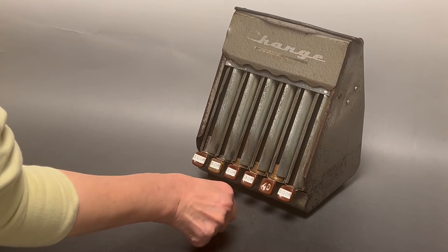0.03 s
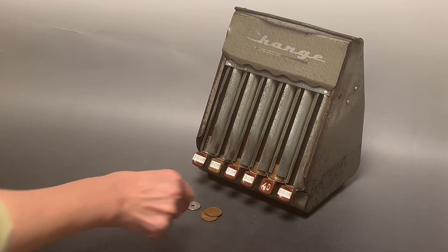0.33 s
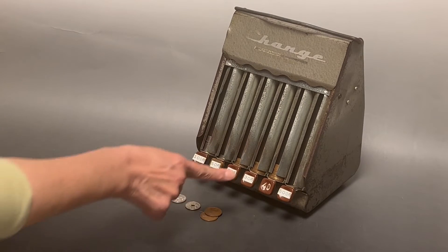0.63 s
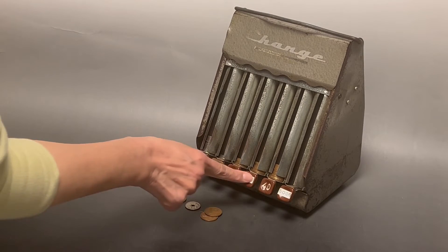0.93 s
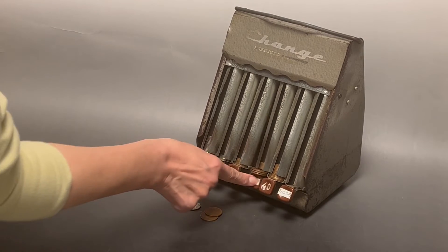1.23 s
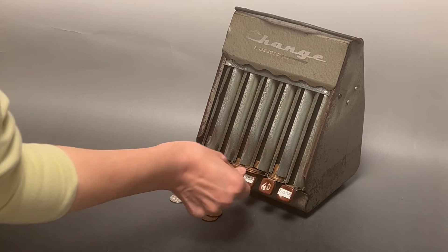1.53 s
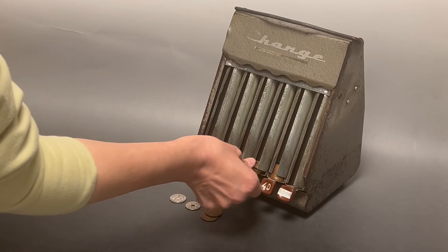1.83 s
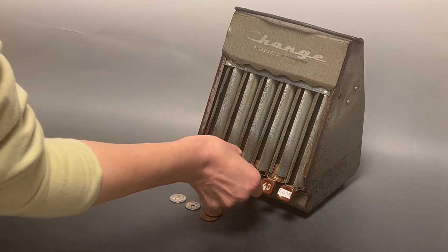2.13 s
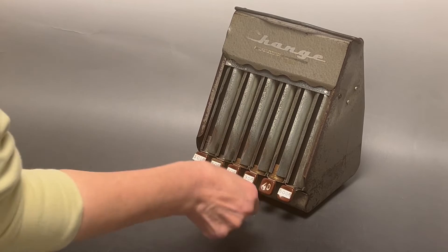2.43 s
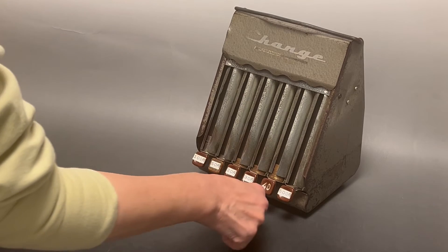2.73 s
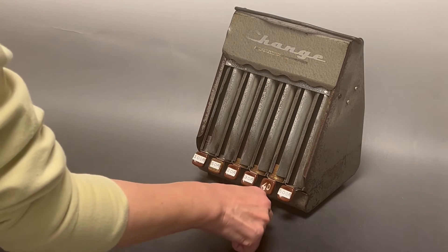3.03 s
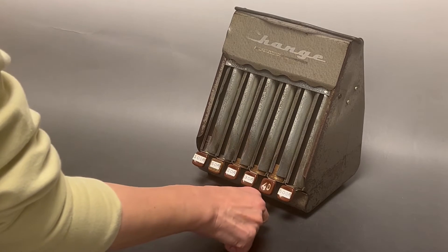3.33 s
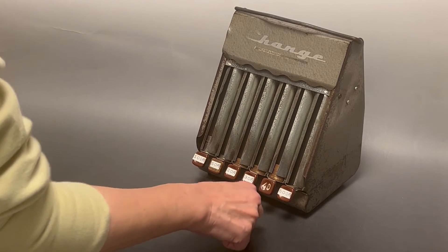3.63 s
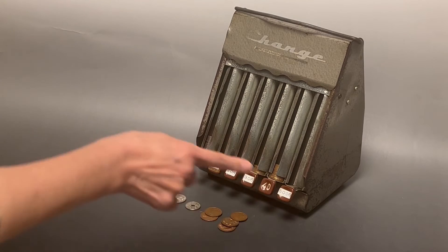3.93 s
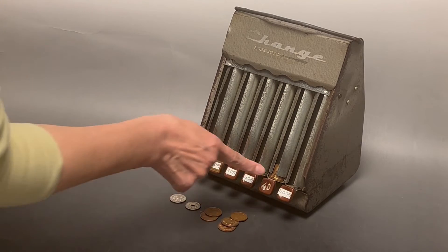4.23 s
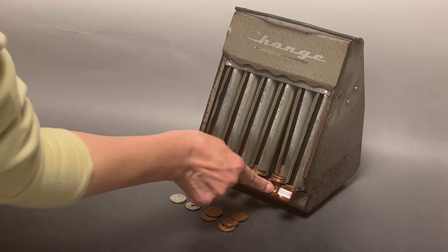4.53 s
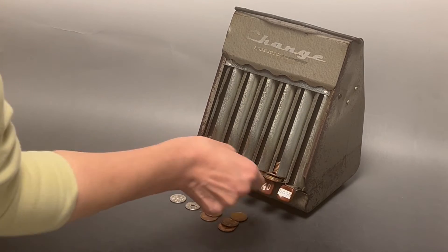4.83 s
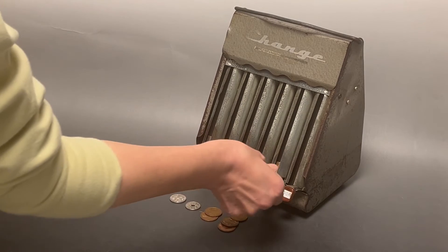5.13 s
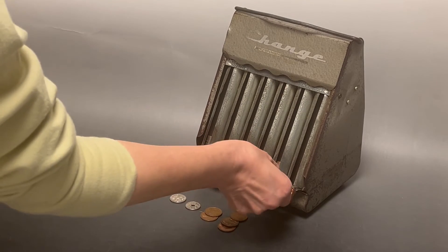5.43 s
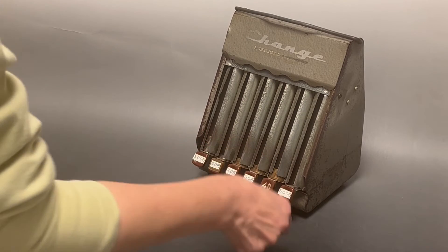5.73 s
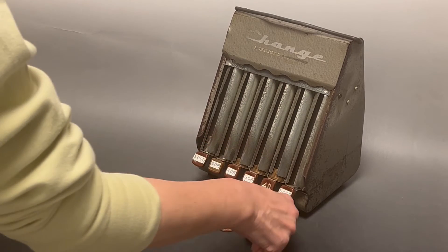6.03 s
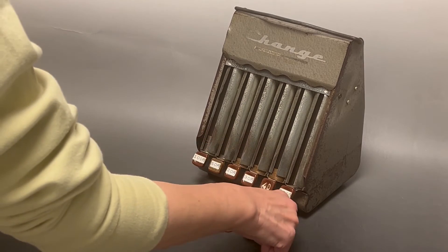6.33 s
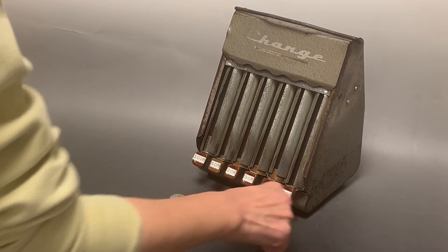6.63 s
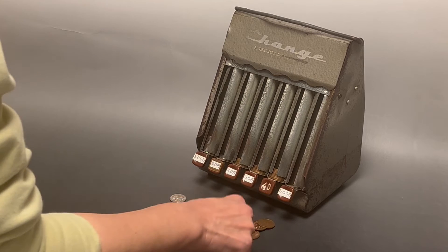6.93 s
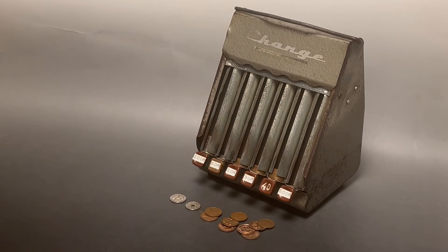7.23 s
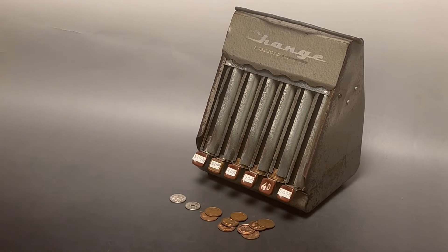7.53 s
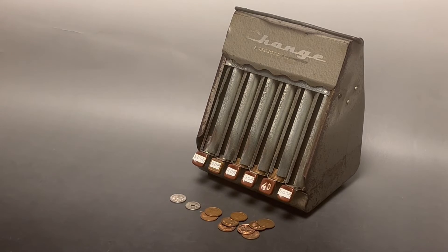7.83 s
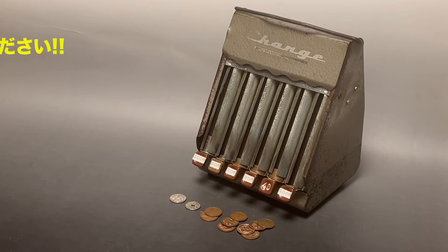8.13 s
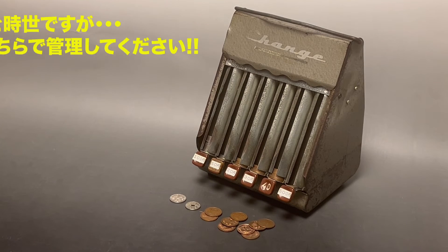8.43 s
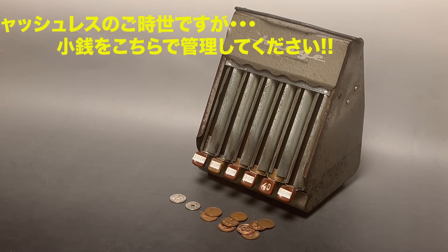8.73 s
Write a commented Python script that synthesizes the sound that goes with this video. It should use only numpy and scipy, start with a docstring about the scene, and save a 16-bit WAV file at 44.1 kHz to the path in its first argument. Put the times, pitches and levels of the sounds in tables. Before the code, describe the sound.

Two scraping, clacking lever strokes on a sheet-metal coin dispenser, with light clinks of coins laid on a table in between.

```python
"""In a quiet room, close to a two-port microphone, a coin is laid on a table, edge first, and rings.
A hand presses a lever of an old sheet-metal coin dispenser: it catches, scrapes, knocks and clacks
against its stop, each impact exciting the modes of the case; let go, it slides back and snaps home.
Coins tick in the hand, slide and are laid down; a second lever makes its stroke; more coins follow.
At the end the arm draws back, its sleeve brushing, and bumps the table softly."""
import sys
import numpy as np
from scipy import signal
from scipy.fft import rfft, irfft
from scipy.io import wavfile
from scipy.ndimage import uniform_filter1d

SR = 44100
rng = np.random.default_rng(int(sys.argv[2]) if len(sys.argv) > 2 else 0)


def transcribe(signal):
    """Save signal, clipped to [-1, 1], as a 16-bit WAV file at the path in sys.argv[1]."""
    frames = np.atleast_2d(signal).T
    limited = np.clip(frames, -1, 1)
    pcm = np.round(limited * 32767).astype(np.int16)
    wavfile.write(sys.argv[1], SR, pcm)


N = 392049


# lever pressed down: (finger lands [s], catches [s], knocks half way [s], is pushed on [s], hits stop [s],
# first-half force [dB], second-half force [dB], knock brightness [dB], rebound from the stop [dB])
PRESSES = [(.908, .941, 1.053, 1.214, 1.275, 1.5, 0, -10, -6),
           (4.333, 4.345, 4.464, 4.649, 4.678, -1.5, -.5, -3, 1.5)]
# lever let go: (comes free [s], slides [s], snaps home [s], freeing force [dB], swell [dB], force [dB])
RELEASES = [(2.051, 2.069, 2.158, -49, 13, -.5), (5.27, 5.375, 5.493, -41, 26, 0.5)]
# loose lever rattling in its guide: (time [s], level [dB], brightness [dB])
RATTLES = [(1.19, -55, -11), (1.238, -50, 6), (2.001, -63, -10), (2.069, -47, -2), (5.465, -35, 8)]
def dispenser():
    """Superposition: the case's responses to every rattle, press and release add up."""
    sounds = [blow(s, 0, db, bright_db, crack_db=-3) for s, db, bright_db in RATTLES]
    for down, up in zip(PRESSES, RELEASES):
        sounds += press(*down) + release(*up)
    out = np.zeros((2, N))
    for s, sound in sounds:
        add(out, s, sound)
    return out


# contacts going down: (level [dB], brightness [dB], crack [dB])
TOUCH, CATCH, PUSH, STOP = (-44, -9.5, -3), (-31, 1.7, -7), (-46, -6, -2), (-19.8, 1.5, 0)
# their bounces: (delay [s], level [dB], brightness [dB], crack [dB])
CATCH_BOUNCE, STOP_BOUNCE = (.0145, -34, 3, 8), (.0075, -23.5, -1.5, 3)
# scrapes: (final level [dB], brightness [dB], swell [dB])
SCRAPE_TO_KNOCK, SCRAPE_TO_STOP = (-49.5, -10, 3), (-46.5, -6, 2)
def press(touch, catch, knock, push, stop, first_db, second_db, knock_bright_db, rebound_db):
    """Impact and friction alternate: the lever catches, scrapes, knocks, rests and runs to its stop."""
    return [blow(touch, first_db, *TOUCH),
            *clack(catch, first_db, CATCH, CATCH_BOUNCE),
            scrape(catch, knock, 0, *SCRAPE_TO_KNOCK),
            blow(knock, 0, db=-36.5, bright_db=knock_bright_db, crack_db=5),
            blow(push, 0, *PUSH),
            scrape(push, stop, second_db, *SCRAPE_TO_STOP),
            *clack(stop, second_db, STOP, STOP_BOUNCE, rebound_db)]


# contacts coming back: (level [dB], brightness [dB], crack [dB])
FREE, SNAP = (-1, -2.5, -5), (-28, 9, 7)
SNAP_BOUNCE = (.035, -41.5, -5, 7)  # (delay [s], level [dB], brightness [dB], crack [dB])
def release(free, slide, home, free_db, swell_db, force_db):
    """Restoring force: the lever comes free and its spring drags it back until it snaps home."""
    return [blow(free, free_db, *FREE),
            scrape(slide, home, force_db, db=-37.5, bright_db=-2, swell_db=swell_db),
            *clack(home, force_db, SNAP, SNAP_BOUNCE)]


def clack(s, force_db, contact, bounce, rebound_db=0):
    """Elastic rebound: a firm contact strikes twice."""
    delay, *second_contact = bounce
    return [blow(s, force_db, *contact), blow(s + delay, force_db + rebound_db, *second_contact)]


def blow(s, force_db, db, bright_db, crack_db):
    """Impulsive excitation: a lever strikes the case once. Returns (time, sound)."""
    response = case_ring(bright_db, dense_db=-1.11, t60_scale=.96)
    return s, amp(force_db + db) * strike(response, crack_db, crack_s=.0031, rise_s=.0012)


def scrape(s, end, force_db, db, bright_db, swell_db):
    """Sliding friction: the lever grows louder as it gathers speed. Returns (time, sound)."""
    response = case_ring(bright_db, dense_db=-1.5, t60_scale=.9)
    return s, amp(force_db) * rub(response, end - s, db - swell_db, db, slips_per_s=600, spread_db=5)


# dense modes of the sheet-metal case: (frequency [Hz], level [dB])
CASE_SPECTRUM = [(100, -7.5), (180, -2.5), (270, -10), (400, -3.5), (560, -7.5), (900, -2.5), (1500, -1.5),
                 (2300, -2), (3100, -6), (5000, -6), (9000, -10.5), (13000, -7.5), (15000, -13),
                 (16200, -33)]
# its distinct modes: (frequency [Hz], level [dB], T60 [s])
CASE_MODES = [(177, -19, 0.23), (355, -21, .42), (411, -20.5, .38), (553, -23.5, 0.38), (696, -22, .42),
              (778, -23, 0.23), (861, -17, .32), (1035, -17.5, .26), (1102, -19, 0.29), (1231, -18.5, 0.27),
              (1470, -19, 0.19), (1657, -19, .26), (2066, -17.5, 0.16), (2300, -17, .19),
              (2655, -19.5, 0.21), (3924, -23, .18)]
# tilt with contact hardness: (frequency [Hz], gain per unit of brightness [dB/dB])
HARDNESS_TILT = [(300, -1), (950, -0.91), (2200, -0.51), (3800, 0), (8000, 0.19), (12000, 0.84)]
def case_ring(bright_db, dense_db, t60_scale):
    """Plate vibration: a harder, smaller contact excites less bass and more treble."""
    tint = [(hz, slope * bright_db) for hz, slope in HARDNESS_TILT]
    return ring(CASE_SPECTRUM, tint, CASE_MODES, dense_db, t60_scale)


# single parts left ringing, such as a spring, tube or coin: (time [s], frequency [Hz], level [dB], T60 [s])
PINGS = [(1.275, 6800, -60.5, 0.41), (1.275, 2767, -55, 0.43), (4.44, 1090, -43, .16),
         (4.68, 690, -37.5, 0.4), (4.68, 716, -37, .55), (5.49, 355.3, -52.5, .8), (6.421, 3230, -42, .16),
         (5.638, 5440, -50.5, 0.087)]
def pings():
    """Free vibration: after a blow or slip, a part rings on at its natural frequency."""
    out = np.zeros((2, N))
    for s, hz, db, t60 in PINGS:
        add(out, s, amp(db) * mode(hz, t60, SR))
    return out


# coins laid down: (landing time [s], level [dB], body [dB], table knock [dB], edge lead [s],
# edge level [dB], bounce interval [s], first bounce level [dB])
LANDINGS = [(.058, -38, -12, -52, .011, -42, .0105, -38.5),
            (2.799, -43.5, -10.5, -48.5, .021, -59, .02, -63), (3.526, -46, 7, -45, .008, -42, .014, -54),
            (6.421, -35.5, 5, -50, .031, -50, 0.026, -42)]
def laid_coins(bounces=3, loss_db=7):
    """Inelastic collision: a coin touches edge first, lands flat and loses energy at each bounce."""
    out = np.zeros((2, N))
    for s, db, body_db, knock_db, lead, edge_db, gap, bounce_db in LANDINGS:
        add(out, s - lead, clink(edge_db, body_db=-22, treble_db=4, crack_db=-12))
        add(out, s, clink(db, body_db, treble_db=-6, crack_db=9.5))
        add(out, s, table_knock(knock_db, bright_db=-2.5))
        for k in range(bounces):
            bounce = clink(bounce_db - k * loss_db, body_db - 9, treble_db=7, crack_db=7.5)
            add(out, s + (k + 1) * gap, bounce)
    return out


# dense modes of a struck coin: (frequency [Hz], level [dB])
COIN_SPECTRUM = [(150, -9), (400, -12.5), (1000, -14), (1600, -6.5), (2500, -9.5), (3400, -5.5),
                 (5000, -14), (6500, -15), (7700, -5.5), (9300, -18), (11500, -15), (12900, 0.5),
                 (14200, -14), (16200, -46.5)]
# its distinct modes: (frequency [Hz], level [dB], T60 [s])
COIN_MODES = [(3250, -17.5, .12), (7730, -20.5, 0.26), (7630, -18.5, 0.21), (7865, -23, 0.15),
              (13200, -9, .1), (12750, -13, 0.17), (12900, -11.5, 0.16)]
def clink(db, body_db, treble_db, crack_db):
    """Inharmonic modes: a struck metal disc rings at unrelated frequencies."""
    pitch = 1 + .008 * rng.standard_normal()  # no two coins ring quite alike
    modes = [(hz * pitch, level, t60) for hz, level, t60 in COIN_MODES]
    response = ring(COIN_SPECTRUM, coin_tint(body_db, treble_db), modes, dense_db=-1.5, t60_scale=.93)
    return amp(db) * strike(response, crack_db, crack_s=.0031, rise_s=.0012)


def coin_tint(body_db, treble_db):
    """Contact area shapes the spectrum: a flat landing has body, an edge has treble."""
    return [(950, body_db), (2200, body_db / 2), (3800, 0), (8000, 0), (12000, treble_db)]


# touches of coin edges and loose parts: (time [s], level [dB], treble [dB])
TICKS = [(.116, -49, 14), (2.271, -51, 11.5), (2.277, -54.5, 14), (2.407, -66, 6.5), (2.545, -63, 5),
         (3.015, -66.5, 10), (3.039, -66.5, 0), (5.262, -58, 6), (5.637, -46.5, 1), (5.911, -60.5, 3.5),
         (6.03, -56.5, 3.5), (6.209, -71.5, 2), (6.302, -63.5, 9.5)]
# their ring: (frequency [Hz], level [dB])
TICK_SPECTRUM = [(300, -20.5), (1500, -14), (3000, -16), (5000, -8), (6200, -5.5), (8500, 1),
                 (11500, -12.5), (14000, -8), (16200, -28)]
def coin_ticks():
    """Short contact time: a light touch on an edge gives a sharp, bright tick."""
    out = np.zeros((2, N))
    for s, db, treble_db in TICKS:
        response = ring(TICK_SPECTRUM, coin_tint(-3.5, treble_db), t60_scale=1.07)
        add(out, s, amp(db) * strike(response, crack_db=7, crack_s=.0016, rise_s=.00016))
    return out


# coins pushed over the table: (start [s], end [s], starting level [dB])
SLIDES = [(2.919, 3.0, -70), (3.206, 3.25, -71.5), (6.17, 6.25, -73), (6.33, 6.4, -68),
          (6.47, 6.614, -51.5)]
# their ring: (frequency [Hz], level [dB])
SLIDE_SPECTRUM = [(700, -27), (1700, -3), (2600, -2.5), (4800, 3), (6300, -9), (8500, -3.5), (11500, -6.5),
                  (13700, 3), (15500, -21)]
def coin_slides(fade_db_per_s=60):
    """Sliding friction: the sound fades as the coin slows."""
    out = np.zeros((2, N))
    for s, end, db in SLIDES:
        response = ring(SLIDE_SPECTRUM, coin_tint(0, 0), t60_scale=.73)
        end_db = db - fade_db_per_s * (end - s)
        add(out, s, rub(response, end - s, db, end_db, slips_per_s=1200, spread_db=4))
    return out


# dense modes of the table top: (frequency [Hz], level [dB])
TABLE_SPECTRUM = [(40, -13), (90, 4.5), (200, -5), (400, -5), (800, -15.5), (2000, -17), (12000, -53.5)]
def table_knock(db, bright_db):
    """Soft impact: mainly the low modes of the table respond."""
    return amp(db) * strike(ring(TABLE_SPECTRUM, [(200, 0), (1500, bright_db)]), crack_db=-7)


# sleeve brushes: (centre [s], half length [s], level [dB], power share of thin hiss [0-1])
BRUSHES = [(6.912, .025, -72.5, .1), (7.19, 0.098, -67, .2), (7.343, .03, -57.5, 0.23),
           (7.611, .03, -72, 0.07), (7.787, 0.078, -70.5, .2), (8.199, .125, -67, 0.98),
           (8.435, 0.02, -70.5, 0.77)]
# full rustle and thin hiss of cloth: (frequency [Hz], level [dB])
CLOTH_SPECTRUM = [(150, -2.5), (2000, 4), (4500, -10), (13000, -15), (16000, -18)]
HISS_SPECTRUM = [(2200, -20), (3800, 3), (7500, -5), (10000, -9), (13000, -4.5), (16000, -10.5)]
# arm against the table: (time [s], level [dB], brightness [dB])
ARM_KNOCKS = [(7.018, -43.5, -2), (7.69, -49.5, -17.5)]
def arm(fall_db=8.5, roundness=1.55):
    """Friction noise: each brush of the sleeve swells and fades; the arm also bumps the table."""
    t = np.arange(N) / SR
    cloth, hiss, out = noise(CLOTH_SPECTRUM, N), noise(HISS_SPECTRUM, N), np.zeros((2, N))
    for s, half, db, thin in BRUSHES:
        swell = amp(db - fall_db * abs((t - s) / half) ** roundness)
        out += swell * (np.sqrt(1 - thin) * cloth + np.sqrt(thin) * hiss)
    out *= amp(1.3 * unit(uniform_filter1d(rng.standard_normal(N), size=200)))  # threads catch and let go
    for s, db, bright_db in ARM_KNOCKS:
        add(out, s, table_knock(db, bright_db))
    return out


# room noise: (frequency [Hz], level [dB])
AIR_SPECTRUM = [(15, -43.5), (25, -13), (92, -7.5), (105, -5), (123, -17.5), (190, -15), (229, -27.5),
                (270, -21), (516, -35.5), (988, -25), (1370, -30), (1700, -29.5), (2550, -47),
                (12200, -62.5), (16000, -71)]
def room_air(air_db=-60.8, hum_hz=91, hum_db=-64, width_hz=9):
    """Stationary noise: a broad floor, and a narrow band heard as a wavering low drone."""
    drone = [(hum_hz - 3 * width_hz, -70), (hum_hz - width_hz, -12), (hum_hz, 0),
             (hum_hz + width_hz, -12), (hum_hz + 4 * width_hz, -70)]
    return amp(air_db) * noise(AIR_SPECTRUM, N) + amp(hum_db) * noise(drone, N)


# decay of dense modes, room included: (frequency [Hz], T60 [s])
RING_T60 = [(100, 0.7), (400, 0.34), (1000, 0.31), (2700, .23), (7000, 0.2), (14000, 0.16)]
def ring(spectrum, tint, modes=(), dense_db=0, t60_scale=1, uneven_db=3.3):
    """Impulse response: overlapping modes act as noise that dies faster in the treble; a few stand out."""
    hz, s, white = signal.stft(rng.standard_normal((2, SR * 2 // 3)), SR, nperseg=512)
    # each point of contact favours its own modes
    favour = unit(uniform_filter1d(rng.standard_normal(len(hz)), 2)) * np.minimum(hz / 500, 1)
    colour = unit(amp(read(spectrum, hz) + uneven_db * favour)) * amp(read(tint, hz) + dense_db)
    dense_t60 = t60_scale * read(RING_T60, hz)
    fade = amp(-60 * s / dense_t60[:, None])
    out = signal.istft(white * colour[:, None] * fade, SR, nperseg=512)[1]
    for f, db, t60 in modes:
        out += amp(db + read(tint, f) + 2 * rng.standard_normal()) * mode(f, t60, out.shape[1])
    return out


def mode(hz, t60, size):
    """Damped oscillator; its rows lie a quarter turn apart, so both ports get equal power."""
    t = np.arange(size) / SR
    phase = rng.uniform(0, 2 * np.pi) + np.array([[0], [rng.choice([-1, 1]) * np.pi / 2]])
    return np.sqrt(2) * np.exp(-np.log(1000) * t / t60) * np.sin(2 * np.pi * hz * t + phase)


def strike(response, crack_db, crack_s=.0025, rise_s=.00054):
    """Attack transient: a crack lifts the ring's onset; bass and glancing blows build more slowly."""
    t = np.arange(response.shape[1]) / SR
    bass = signal.sosfiltfilt(signal.butter(2, 600, fs=SR, output="sos"), response)
    crack = np.sqrt(1 + amp(crack_db) ** 2 * np.exp(-t / crack_s))
    rise = 1 - np.exp(-t / (rise_s * (1 + amp(-crack_db)) / 2))
    return (response - bass) * crack * rise + bass * (1 - np.exp(-t / .0044))


def rub(response, seconds, start_db, end_db, slips_per_s, spread_db):
    """Stick-slip friction: small random impulses are convolved with the impulse response."""
    size = max(int(seconds * SR), 64)
    slips = (rng.random(size) < slips_per_s / SR) * rng.choice([-1, 1], size)
    strength = amp(spread_db * rng.standard_normal(size))
    force = unit(slips * strength) * amp(np.linspace(start_db, end_db, size))
    ring_samples = SR * read(RING_T60, 5000) / np.log(1e6)  # time constant of the ring's energy
    return signal.fftconvolve(force[None], response, axes=1) / np.sqrt(ring_samples)


def noise(spectrum, size):
    """Spectral shaping: two independent coloured noises of rms 1."""
    white = rng.standard_normal((2, size))
    colour = amp(read(spectrum, np.fft.rfftfreq(size, 1 / SR)))
    return unit(irfft(rfft(white) * colour, size))


def amp(db):
    """Decibels to amplitude ratio."""
    return 10 ** (np.asarray(db) / 20)


def unit(x):
    """Normalisation to rms 1."""
    return x / np.sqrt(np.mean(x ** 2) + 1e-20)


def read(points, hz):
    """Interpolation on a log-frequency axis."""
    f, value = np.transpose(points)
    return np.interp(np.log(hz + 1), np.log(f), value)


def add(mix, s, sound):
    """Superposition of a two-row sound on the mix at time s."""
    part = mix[:, max(round(s * SR), 0):][:, :sound.shape[1]]
    part += sound[:, :part.shape[1]]


# likeness of the two microphone ports: (frequency [Hz], coherence [0-1])
PORT_COHERENCE = [(100, .97), (300, .8), (500, .62), (750, .45), (1000, .72), (1400, .35), (1700, .5),
                  (2100, .96), (4800, .99), (5600, .88), (6600, .98), (8500, .84), (12800, .97),
                  (15000, .85)]
# phase between them: (frequency [Hz], lead of the left port [rad])
PORT_LEAD = [(1000, 0), (1550, -1), (1900, 0), (3200, .35), (5000, 0), (5600, -.9), (6500, 0), (7400, -.3),
             (8500, -1.5), (9900, -3.14), (11000, -4.2), (12400, -6.1), (13300, -6.5), (15500, -9.1)]
def scene():
    """Partial coherence: the sources' first row is common to both ports, the second sets them apart."""
    mid, side = rfft(dispenser() + laid_coins() + coin_ticks() + coin_slides() + pings() + arm()
                     + room_air())
    hz = np.fft.rfftfreq(N, 1 / SR)
    coherence = read(PORT_COHERENCE, hz)
    mid *= np.sqrt((1 + coherence) / 2)
    side *= np.sqrt((1 - coherence) / 2)
    half_lead = np.exp(.5j * read(PORT_LEAD, hz))
    return irfft(np.array([(mid + side) * half_lead, (mid - side) / half_lead]), N)


LOW_CUT_HZ, BAND_LIMIT_HZ = 42, 15700
def record(dry):
    """Band limiting: the microphone's low cut, then a steep low-pass."""
    lean = signal.sosfilt(signal.butter(3, LOW_CUT_HZ, "highpass", fs=SR, output="sos"), dry)
    low_pass = signal.firwin(255, BAND_LIMIT_HZ, window=("kaiser", 9), fs=SR)
    return signal.oaconvolve(lean, low_pass[None], "same")


dry = scene()
out = record(dry)
transcribe(out)
```